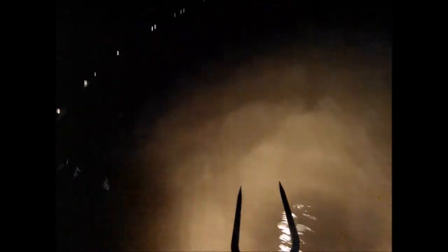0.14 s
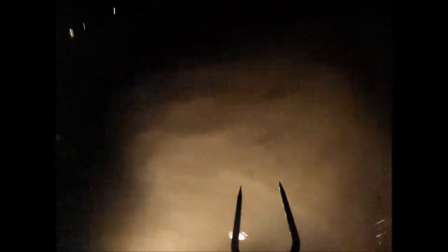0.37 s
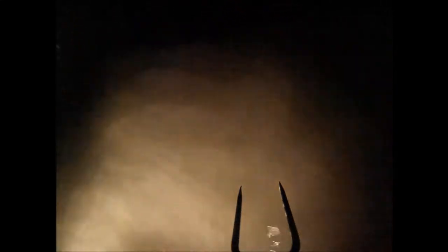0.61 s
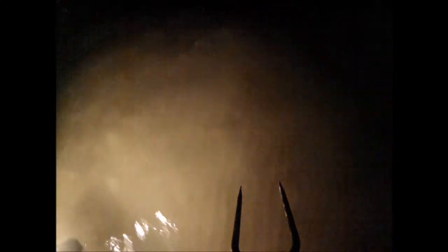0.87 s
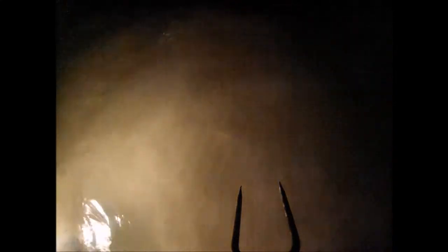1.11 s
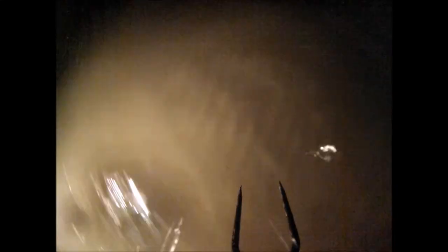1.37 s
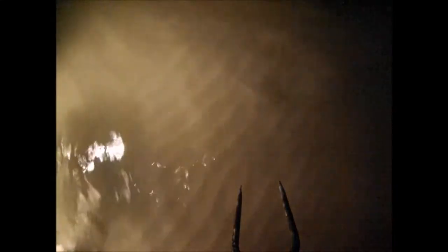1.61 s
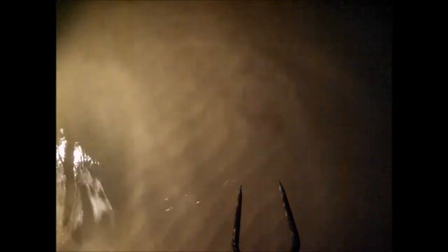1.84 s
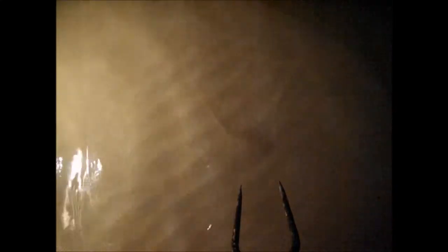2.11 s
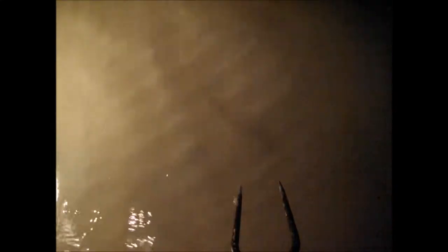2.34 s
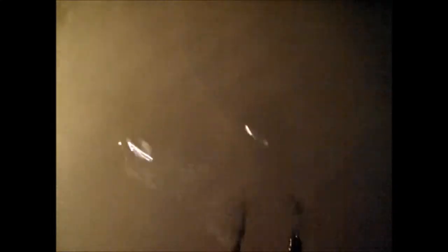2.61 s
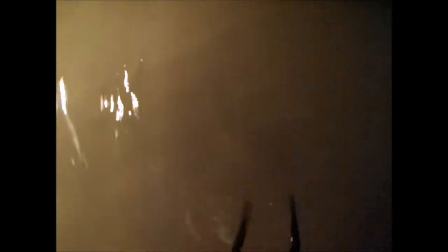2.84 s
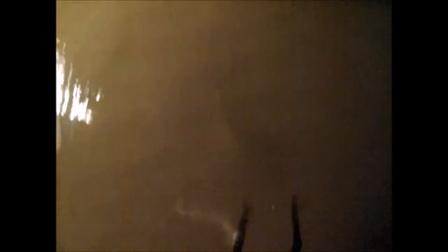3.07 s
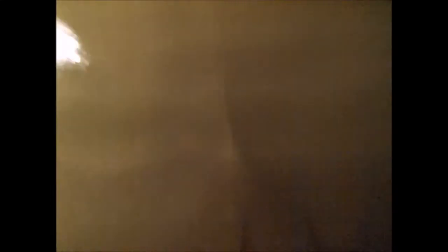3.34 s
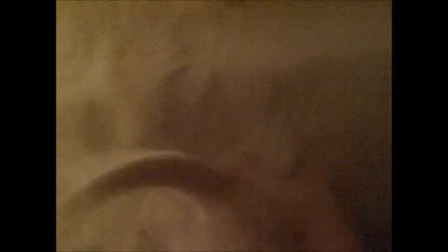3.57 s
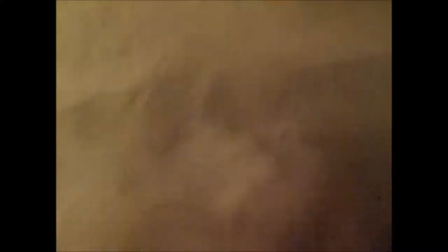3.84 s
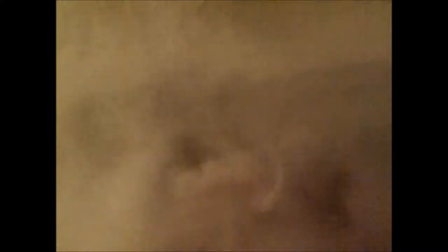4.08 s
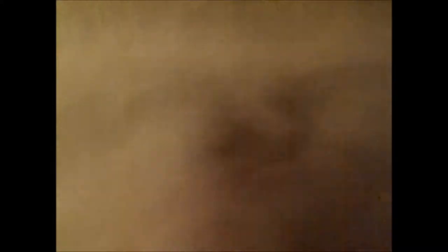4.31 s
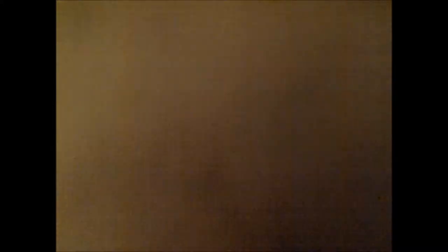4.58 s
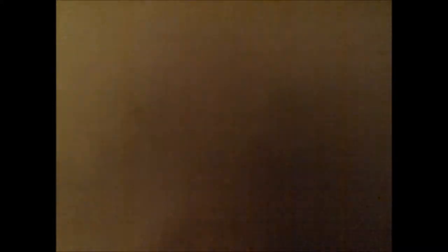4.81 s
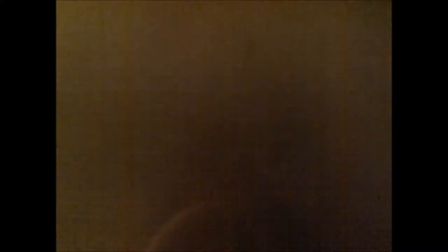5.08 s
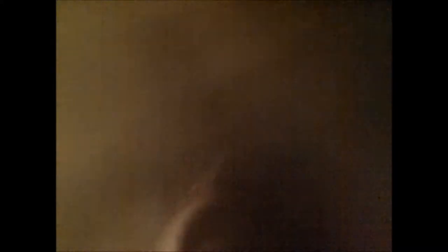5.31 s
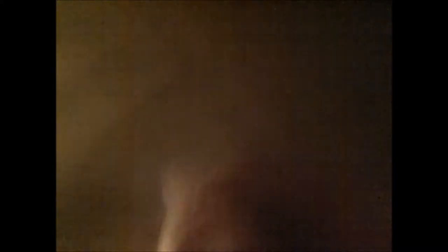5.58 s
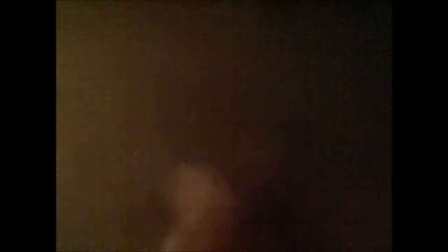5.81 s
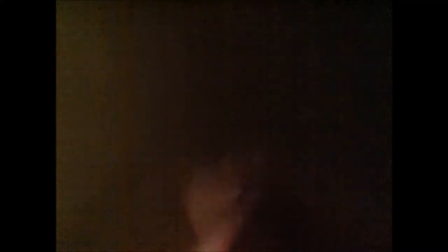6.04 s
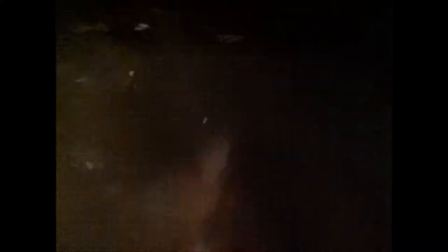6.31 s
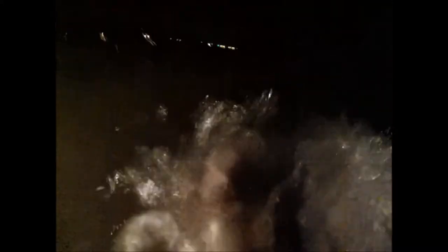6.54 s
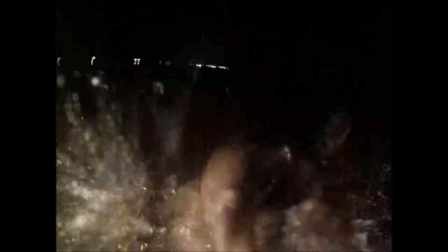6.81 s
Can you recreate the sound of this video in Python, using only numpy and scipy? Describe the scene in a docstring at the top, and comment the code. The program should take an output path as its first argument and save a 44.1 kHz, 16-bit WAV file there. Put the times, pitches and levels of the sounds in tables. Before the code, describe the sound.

Faint steady hiss under boomy pole vibration, with brief squeaky grip slides and hollow thuds. After a quiet lull the spear strikes the bottom with a sharp double crack and sandy crunch. Muffled water and sand drag along the shaft while trapped air burbles. Then the drag stops; drops plink, spray patters and dense slaps hit the housing, growing toward the end. Dry, contact-like, mono.

```python
"""A camera in a sealed housing rides a spear pole through shallow surf at night, over a faint steady hiss.
First hands slide on the shaft while the pole shakes, thumps and knocks; a few bubbles ring. At 3.4 s the spear
is driven into the bottom with a crunch; then water and sand rub along the pole and trapped air gurgles.
From 5.6 s small drops trickle, spray spatters, and drops and slaps strike the housing. Shaped noise makes the
friction, excited resonances the blows, decaying sines the thumps and bubbles."""
import sys
import numpy as np
from scipy import signal
from scipy.fft import rfft, irfft, next_fast_len
from scipy.io import wavfile
from scipy.ndimage import uniform_filter1d, map_coordinates

SR = 44100
rng = np.random.default_rng(int(sys.argv[2]) if len(sys.argv) > 2 else 0)


def magnitude_from_level(level_db):
    """Linear magnitude for a level in decibels (20 dB per decade)."""
    exponent = np.asarray(level_db, float) / 20
    return 10 ** exponent


def materialize(psi):
    """Save the field psi as 16-bit PCM at rate SR to the path in sys.argv[1].

    A 1-D psi becomes a single channel; in a 2-D psi each row is a channel.
    """
    bounded = np.clip(np.atleast_2d(psi).T, -1, 1)
    quanta = np.round(bounded * 32767).astype(np.int16)
    wavfile.write(sys.argv[1], SR, quanta)


N = 305172
TIME_S = np.arange(N) / SR
STAB_S = 3.4  # from here the prongs carry a load and the pole bends in other modes
SPLIT_HZ = 4500  # between body and treble of the friction sounds

# Spectrum of the microphone floor: frequency_hz, relative_level_db (per Hz)
HISS_SPECTRUM = [(120, -24), (200, -7), (380, -2.5), (647, -4.5), (1910, -20), (11700, -24.5), (16000, -41)]
# Shaking of the pole: time_s, sway_db, housing_drum_db
SHAKE_LEVELS = [(0.0, -32, -32), (0.07, -34.5, -46), (0.21, -44, -49), (0.42, -48, -69), (0.61, -51, -58),
                (0.85, -38, -49.5), (1.15, -39.5, -41), (1.39, -23.5, -37), (1.58, -40.5, -42),
                (1.81, -46.5, -63), (2.83, -53, -70.5), (3.03, -48, -46.5), (3.39, -49, -70),
                (3.55, -28, -38), (3.62, -28.5, -39.5), (3.76, -31, -29.5), (3.93, -42.5, -47.5),
                (4.49, -44, -48.5), (5.22, -46.5, -48.5), (5.61, -34.5, -47.5), (5.95, -32.5, -46.5),
                (6.4, -34.5, -46), (6.73, -29, -36.5), (6.92, -23, -36)]
# Unloaded pole, one bending mode then two drum modes: centre_hz, width_hz, relative_level_db
FREE_MODES = [(46, 16, 0), (122, 42, -2), (168.7, 75, -7)]
# Pole bending, the first mode throughout, the others under load: centre_hz, width_hz, relative_level_db
SWAY_MODES = [(28.8, 11, 0), (42.7, 10, -3), (83, 38, -6)]
# Housing as a drum while the pole is loaded: centre_hz, width_hz, relative_level_db
DRUM_MODES = [(134.6, 13, -6.5), (215, 42, -32.5)]
# Hands shifting their grip: start_s, level_db, slide_s, swell_db (over the slide)
GRIP_SLIDES = [(0, -47, 0.19, -1), (.49, -63, 0.024, -8.5), (0.558, -52, 0.047, -7.5),
               (0.721, -47.5, 0.0024, 5.5), (0.873, -47.5, 0.02, -6.5), (0.971, -50, 0.057, -0.5),
               (1.104, -45.5, 0.14, -4.5), (1.231, -42, 0.002, 3.5), (1.273, -47, 0.082, 12),
               (1.42, -55, 0.061, 0.5), (1.54, -46.5, 0.096, -17), (1.714, -68, 0.012, 15.5),
               (1.86, -63, 0.054, -1.5), (1.974, -60, 0.08, -13), (2.536, -58.5, 0.006, -13),
               (2.575, -59.5, .003, -11), (2.939, -50.5, 0.0036, -21), (2.97, -60.5, 0.0027, 7.5),
               (3.006, -52.5, 0.036, -13)]
# Pole and mount under a hand: centre_hz, width_hz, relative_level_db
GRIP_PEAKS = [(970, 180, -6.5), (1356, 75, -2.5), (1667, 147, -1), (2504, 22, -11), (3306, 210, -14.5),
              (5500, 210, -23), (10600, 2600, -45)]
# Broad slope under those peaks: frequency_hz, relative_level_db
GRIP_SLOPE = [(150, 5.5), (300, -2), (600, -4), (1200, -9.5), (2000, -15), (2600, -24.5), (5000, -32),
              (10000, -49), (16000, -90)]
# Thumps carried up the pole: start_s, level_db, pitch_hz
THUMP_EVENTS = [(0.004, -20, 58.7), (0.733, -22, 46), (0.857, -26.5, 48.2), (0.596, -27, 121),
                (0.721, -14.5, 134), (0.872, -22, 123), (0.97, -20.5, 122), (1.104, -17, 125),
                (1.298, -16.5, 123), (1.361, -10, 30.5), (1.537, -25, 130), (2.934, -32.5, 110),
                (3.002, -27, 122), (3.2, -35, 161), (3.398, -9.5, 112.6), (3.445, -3.5, 128.3),
                (3.457, -1.5, 138.3), (3.5509, -6.5, 134.8), (3.555, -13, 59.3), (3.568, -19.5, 28.4),
                (3.67, -24.5, 28.8), (4.26, -29, 84.3), (5.169, -26.5, 32), (5.34, -20.5, 29.4),
                (5.631, -19.5, 44.7), (5.86, -15, 29.7), (4.478, -26, 130), (5.077, -25, 146),
                (5.992, -19.5, 130.3), (6.118, -16, 123), (6.53, -23.5, 139), (6.745, -16.5, 146),
                (6.829, -14.5, 97)]
# Knocks of pole and mount: start_s, hard_drive_db, hollow_db (relative to hard)
KNOCK_EVENTS = [(0.7188, -42.5, 15.5), (1.1983, -36.5, 11.5), (1.2279, -26.5, 8), (1.5025, -35, 7),
                (1.5584, -31, -1.5), (1.5859, -32, 5.5), (1.9737, -50.5, 12.5), (2.14, -63.5, 13),
                (2.392, -57, 9), (2.829, -51, 9.5), (2.9318, -48, 9.5), (3.6511, -34, 11),
                (3.6741, -34, 15.5), (3.7388, -22, 12.5), (3.7691, -45, 25.5), (3.8093, -26, 9.5),
                (3.8914, -31, 10.5), (4.243, -40.5, 14), (4.56, -37.5, 14), (4.8853, -48.5, 27.5),
                (5.9902, -40, 15.5), (6.115, -35.5, 12.5), (6.295, -47, 20.5)]
# Blows, slaps and drops on the housing: start_s, hard_drive_db, bright_db and spray_db (relative to hard),
# decay_s (to 60 dB down, before each mode group's own exponent)
HIT_EVENTS = [(1.384, -37, 2, 2, 0.017), (3.341, -39.5, -10.5, -26, 0.06), (3.39, -27, -11, -11.5, 0.017),
              (3.3951, 10, 1.5, 0, 0.012), (3.4056, -13, -10, -9, .03), (3.4155, -16, 10, -7.5, 0.013),
              (3.4185, -18, 11, -8, 0.018), (3.428, -15.5, 4.5, -5, 0.027), (3.4448, 5.5, -38, -18, 0.03),
              (3.4597, -2, -32, -10, 0.024), (3.4657, -8, -27, -15, 0.025),
              (3.528, -12, -6.5, -19.5, 0.035), (3.5418, 2, -4, -27, 0.012), (3.5491, -5, -7, -13, 0.02),
              (3.554, -2, -15, -5, 0.026), (5.659, -28.5, -34, -44, 0.031), (5.733, -39, -2.5, -9.5, 0.041),
              (5.7679, -30, -12.5, -12, 0.057), (5.887, -43.5, 0, 4.5, 0.056),
              (5.9132, -46, 4.5, -3, 0.018), (6.0167, -41.5, -4, -12.5, 0.055),
              (6.1951, -31, -3, -5, 0.022), (6.259, -47, -2, -5, 0.033), (6.273, -42, -9, -12, .02),
              (6.2805, -37.5, 1, 10, 0.022), (6.288, -46, 1, 6, .04), (6.297, -32, -21, -25, 0.02),
              (6.322, -29.5, -3, 3, 0.022), (6.3689, -7.5, -11.5, -38, 0.026), (6.378, -38, -8, -14, 0.063),
              (6.4022, -42, 8, 0, 0.023), (6.4221, -38, 2, 12, 0.013), (6.4266, -10, -13.5, -20, 0.023),
              (6.4376, -15, -11, -14, 0.025), (6.4504, -33, 8, 6, .018), (6.4766, -22, -6, -24, 0.015),
              (6.5262, -26.5, -17, -32, 0.096), (6.5676, -20.5, -23, -27, 0.035),
              (6.598, -16, -23, -32, 0.026), (6.611, -11, -12, -19, 0.029), (6.644, -30, -8, -13, 0.017),
              (6.682, -13.5, -10, -8, 0.017), (6.6996, -3.5, -6, -11, 0.016), (6.722, -41, -6, -2.5, 0.034),
              (6.7337, -14.5, -13, -9, 0.02), (6.7497, 3.5, -16.5, -13, 0.018),
              (6.792, -24.5, -16, -15, 0.028), (6.808, -37.5, -3, -8, 0.05),
              (6.833, -17.5, -8, -10.5, 0.028), (6.836, -22.5, -14, -23, 0.055),
              (6.8598, -21.5, -13, -18, 0.058), (6.873, -23, -8.5, -22, 0.043),
              (6.881, -19.5, -14, -27.5, 0.058), (6.9003, -14.5, -11, -21, 0.042)]
# The mount under a knock: centre_hz, width_hz, relative_level_db
MOUNT_MODES = [(241, 246, 0.0083)]
# Housing modes in four groups, hollow, hard, bright, spray: centre_hz, width_hz, relative_level_db
BLOW_GROUPS = [
    [(320, 530, -10.5), (527, 90, 8.5), (775, 140, 6)],
    [(1282, 347, 6), (1610, 454, 5.5), (2200, 680, 0.5)],
    [(3560, 430, 4.5), (5140, 430, 2.5), (6800, 1400, -1)],
    [(9900, 2300, 0.5), (12500, 2600, -2.5)],
]
# Decay shape of mount and four groups: time_exponent (1 = plain decay, more = holds, then stops short)
DECAY_SHAPES = [
    [1],
    [0.86],
    [1.02],
    [1.49],
    [1.18],
]
# Band the walls pass weakly: centre_hz, width_hz, subtracted_db
DEAD_BAND = [(8700, 3300, -5.5)]
# Bubbles: start_s, level_db, pitch_hz
BUBBLE_EVENTS = [(2.536, -51, 2070), (2.571, -50, 2140), (3.341, -35, 1605), (3.596, -39, 4330),
                 (3.629, -37, 5100), (3.864, -30, 1222), (4.141, -47.5, 1442), (4.165, -42.5, 1855),
                 (4.176, -40.5, 1310), (4.9, -30.5, 395), (5.434, -30.5, 2345), (5.66, -35, 1310),
                 (5.661, -38, 2500), (5.769, -39, 1060), (5.768, -29, 3870), (5.9134, -30.5, 2500),
                 (6.139, -40.5, 2940), (6.176, -43, 1500), (6.181, -40.5, 2200), (6.201, -34.5, 1740),
                 (6.2033, -31.5, 5070), (6.205, -31, 3300), (6.212, -17.5, 2384), (6.229, -38, 3470),
                 (6.241, -36, 2070), (6.241, -35, 3480), (6.3072, -21, 1740), (6.316, -17, 5570),
                 (6.339, -32, 2200), (6.397, -29, 5100), (6.4504, -23.5, 3880), (6.538, -38, 1900),
                 (6.569, -32, 1470), (6.8155, -24, 2540)]
# Resonances of the housing walls: centre_hz, width_hz, relative_level_db
HOUSING_PEAKS = [(526.6, 100, 3.5), (735, 40, 0.5), (1020, 29, -4.5), (1332, 120, -10), (1571, 120, -3.5),
                 (2070, 160, -8.5), (2960, 130, -17.5), (3630, 110, -24.5), (4260, 91, -27),
                 (5230, 250, -29), (5870, 88, -31), (6250, 320, -37.5), (7700, 570, -41),
                 (8640, 250, -46.5), (9150, 380, -48), (11300, 500, -47.5), (11900, 700, -45),
                 (13790, 460, -55.5)]
# Broad slope under the housing peaks: frequency_hz, relative_level_db
HOUSING_SLOPE = [(150, -5), (400, -15.5), (1000, -20.5), (2500, -19), (3300, -27.5), (5000, -43.5),
                 (10000, -69.5), (16000, -94)]
# The thrust grinding into the sand: time_s, body_db, treble_db
THRUST_LEVELS = [(3.392, -84, -93), (3.397, -18, -33), (3.41, -15.5, -32.5), (3.43, -28.5, -40),
                 (3.475, -26.5, -47.5), (3.522, -28, -46.5), (3.538, -17.5, -34), (3.553, -13.5, -27),
                 (3.56, -19, -55), (3.575, -74, -87.5)]
# Spectrum of the grinding: frequency_hz, relative_level_db (per Hz)
GRIND_SPECTRUM = [(150, -32.5), (250, 3.5), (436, -5.5), (528, -2.5), (662, -5.5), (906, 3.5), (1180, -7),
                  (1380, -4), (2400, -6), (3600, -18.5), (6500, -28.5), (8200, -36), (9700, -31.5),
                  (10600, -37.5), (12000, -32.5), (16000, -45)]
# Water and sand dragging along pole and housing, then running off: time_s, rub_db, fizz_db
DRAG_LEVELS = [(3.53, -110, -110), (3.573, -37.5, -69), (3.66, -58, -67), (3.8, -44, -70.5),
               (3.93, -43, -67), (4.08, -51, -72.5), (4.18, -48.5, -83), (4.25, -62, -85),
               (4.32, -44.5, -70), (4.5, -50, -76), (4.57, -44.5, -68.5), (4.9, -36.5, -58),
               (5.0, -41.5, -63), (5.2, -39, -61.5), (5.35, -41, -59.5), (5.54, -40.5, -58.5),
               (5.61, -69.5, -92), (6.17, -75, -101), (6.25, -64, -74.5), (6.4, -59, -87),
               (6.55, -55.5, -73), (6.66, -47, -67), (6.78, -53, -70), (6.84, -36, -65), (6.92, -44, -59)]
# Brief stalls of the flow: centre_s, depth_db, half_length_s
FLOW_STALLS = [(4.227, 10.5, 0.022), (4.801, 1, .012), (5.269, 6, 0.039), (5.438, 4, 0.0062)]
# Gurgle of trapped air while the catch is dragged under water: time_s, level_db
GURGLE_LEVELS = [(3.58, -31.5), (3.95, -50), (4.4, -49), (4.9, -49), (5.2, -43), (5.55, -62)]
# Trickle of small drops as the catch breaks the surface: time_s, level_db
RUNOFF_LEVELS = [(5.6, -66.5), (6.299, -61.5), (6.6, -55.5), (6.8, -44), (6.92, -35)]
# Fine spray spattering the housing: time_s, level_db
MIST_LEVELS = [(6.17, -73), (6.3, -63), (6.39, -52), (6.5, -59), (6.65, -54), (6.92, -46)]


def curves(rows):
    """Linear interpolation: one value per sample for each column after the time."""
    s, *columns = np.transpose(rows)
    return [np.interp(TIME_S, s, column) for column in columns]


def unit(x):
    """Normalisation to rms 1."""
    return x / np.sqrt(np.mean(x ** 2) + 1e-20)


def wobble(rate):
    """Slow random fluctuation: a smooth curve through rate random knots a second."""
    knots = rng.standard_normal(int(N * rate / SR) + 4)
    return map_coordinates(knots, [TIME_S * rate])


def filtered(x, response):
    """Linear filtering: the spectrum of x times a complex response of frequency."""
    m = next_fast_len(N + SR // 2)
    return irfft(rfft(x, m) * response(np.fft.rfftfreq(m, 1 / SR)), m)[:N]


def colour(points):
    """Spectral envelope: gain through (Hz, dB) points on a log frequency axis."""
    f, db = np.transpose(points)
    return lambda hz: magnitude_from_level(np.interp(np.log(hz + 1), np.log(f + 1), db))


def modes(table):
    """Modal superposition: causal resonances summed with alternating sign."""
    def response(f):
        return sum((-1) ** k * magnitude_from_level(db) * 1j * f * w / (c * c - f * f + 1j * f * w)
                   for k, (c, w, db) in enumerate(table))
    return response


def through(peaks, slope):
    """Transmission path: sharp-flanked resonances and a broad slope, added in power."""
    def gain(f):
        power = sum(magnitude_from_level(2 * db) / (1 + (2 * (f - c) / w) ** 2) ** 1.4 for c, w, db in peaks)
        return np.sqrt(power + colour(slope)(f) ** 2)
    return gain


def lower_band(x):
    """Band splitting: what lies below a gentle edge at SPLIT_HZ."""
    return filtered(x, lambda f: 1 / (1 + (f / SPLIT_HZ) ** 4))


def grit(spread_db, rate):
    """Stick-slip friction: noise whose size jumps about, as grains catch and slip."""
    return rng.standard_normal(N) * magnitude_from_level(spread_db * wobble(rate))


def patchy(x, patchy_db):
    """Turbulence: random patches of gain over time and frequency, as eddies come and go."""
    z = signal.stft(x, nperseg=512)[2]
    across_hz = uniform_filter1d(rng.standard_normal(z.shape), size=3, axis=0)
    field = uniform_filter1d(across_hz, size=18, axis=1)
    return signal.istft(z * magnitude_from_level(patchy_db * unit(field)), nperseg=512)[1][:N]


def hiss():
    """Self-noise: the microphone's own steady, coloured hiss."""
    return magnitude_from_level(-77.5) * unit(filtered(rng.standard_normal(N), colour(HISS_SPECTRUM)))


def shake():
    """Forced vibration: hands and waves keep the pole's bending modes and the housing drum going."""
    sway_db, drum_db = curves(SHAKE_LEVELS)
    free = TIME_S < STAB_S

    def share(free_db, loaded_db):  # of the sway; each share drifts on its own
        return sway_db + np.where(free, free_db, loaded_db) + 1.56 * wobble(5.9)

    def before_and_after(x, free_response, loaded_response):
        return np.where(free, unit(filtered(x, free_response)), unit(filtered(x, loaded_response)))

    def walls(f):
        return f * f / (f * f + 90 ** 2) / (1 + (f / 225) ** 8)

    swing_db, bend_db = share(-5, 0.5), share(2.5, -1)
    swing = filtered(grit(2.4, 17), lambda f: modes(SWAY_MODES[:1])(f) ** 2)
    bend = before_and_after(grit(2.4, 14), lambda f: modes(FREE_MODES[:1])(f) ** 2,
                            lambda f: modes(SWAY_MODES[1:])(f) / (1 + (f / 100) ** 4))
    drum = before_and_after(grit(2.7, 30), lambda f: modes(FREE_MODES[1:])(f) * walls(f),
                            lambda f: modes(DRUM_MODES)(f) * walls(f))
    return magnitude_from_level(swing_db) * unit(swing) + magnitude_from_level(bend_db) * bend + magnitude_from_level(drum_db) * drum


def scuff():
    """Sliding friction: skin on the wet shaft grabs, slides and lets go."""
    grab_db_per_s, let_go_db_per_s = 1098.5, 526
    press = np.zeros(N)
    for s, db, slide, swell_db in GRIP_SLIDES:
        swell = swell_db * np.clip((TIME_S - s) / slide, 0, 1)
        grab = grab_db_per_s * np.maximum(s - TIME_S, 0)
        let_go = let_go_db_per_s * np.maximum(TIME_S - s - slide, 0)
        press += magnitude_from_level(db + swell - grab - let_go)
    return press * unit(filtered(grit(3.64, 200), through(GRIP_PEAKS, GRIP_SLOPE)))


def thumps():
    """Damped free vibration: each jolt rings the housing drum or the whole pole for a few cycles."""
    ring_cycles = 12  # to 60 dB down
    out, t = np.zeros(N + SR), np.arange(SR // 2) / SR
    for s, db, hz in THUMP_EVENTS:
        onset = 1 - np.exp(-t * hz / 0.18)
        decay = magnitude_from_level(db - 60 * t * hz / ring_cycles)
        out[round(s * SR):][:len(t)] += decay * onset * np.sin(2 * np.pi * hz * t)
    return out[:N]


def hits():
    """Impact excitation: short noisy blows drive groups of modes; only knocks reach the mount."""
    blows, t = np.zeros((5, N + SR)), np.arange(SR // 8) / SR  # rows: mount, hollow, hard, bright, spray
    snap = 1 + 2.2 * np.exp(-t / 0.00048)  # the first contact is the hardest
    onset = 1 - np.exp(-t / [[.001], [.0003], [.00029], [.0006], [.0006]])
    fade_exponent = [[.7], [.6], [1.2], [3.5], [4]]  # treble dies first
    # each event: start, drive, mount, hollow, bright and spray shares, decay
    events = [(s, db, hollow_db + 9.5, hollow_db, -39, -np.inf, 0.033) for s, db, hollow_db in KNOCK_EVENTS]
    for s, db, *rest in HIT_EVENTS:
        hollow_db = -8 - 0.0376 * db  # the harder the blow, the smaller its hollow share
        events.append((s, db, -np.inf, hollow_db, *rest))
    for s, db, mount_db, hollow_db, bright_db, spray_db, decay_s in events:
        fade = magnitude_from_level(-60 * (t / decay_s) ** DECAY_SHAPES) * onset
        size = magnitude_from_level(db + np.array([[mount_db], [hollow_db], [0], [bright_db], [spray_db]]))
        noise = rng.standard_normal((5, len(t)))
        blows[:, round(s * SR):][:, :len(t)] += size * fade ** fade_exponent * snap * noise

    def steep(group):  # a broad resonance, squared, steepens the flanks of the group
        lowest_hz = group[0][0]
        broad = modes([(lowest_hz * 1.3, lowest_hz * 2.5, 0)])
        return lambda f: modes(group)(f) * broad(f) ** 2

    groups = [MOUNT_MODES] + list(BLOW_GROUPS)
    mount, *walls = (filtered(blow[:N], steep(group)) for blow, group in zip(blows, groups))
    return mount + filtered(sum(walls), lambda f: 1 - modes(DEAD_BAND)(f))


def bubbles():
    """Bubble resonance: trapped air pops and sings one short, unsteady note that drifts in pitch."""
    ring_cycles, pop_db, pop_s = 50.7, 5.5, .0015  # ring to 60 dB down; click as it pinches off
    notes, pops, t = np.zeros(N + SR), np.zeros(N + SR), np.arange(SR // 8) / SR
    for s, db, hz in BUBBLE_EVENTS:
        fade = magnitude_from_level(db - 60 * t * hz / ring_cycles) * (1 - np.exp(-t / 0.0014))
        pop = magnitude_from_level(db + pop_db) * np.exp(-t / pop_s) * rng.standard_normal(len(t))
        drift = 1 + rng.normal(-1.2, 0.9) * t
        pops[round(s * SR):][:len(t)] += pop
        notes[round(s * SR):][:len(t)] += fade * np.sin(2 * np.pi * hz * t * drift)
    flutter = magnitude_from_level(4 * wobble(350))
    return notes[:N] * flutter + filtered(pops[:N], through(HOUSING_PEAKS[3:], HOUSING_SLOPE))


def thrust():
    """Granular friction: the prongs crunch through sand; the treble comes and goes on its own."""
    body_db, treble_db = curves(THRUST_LEVELS)
    crunch = filtered(patchy(grit(3.5, 250), patchy_db=3), colour(GRIND_SPECTRUM))
    body = lower_band(crunch)
    return magnitude_from_level(body_db) * unit(body) + magnitude_from_level(treble_db) * unit(crunch - body)


def drag():
    """Flow friction: gritty noise through the housing, its body and its fizz moving apart."""
    rub_db, fizz_db = curves(DRAG_LEVELS)
    stall_db = sum(db * np.exp(-((TIME_S - s) / half) ** 4) for s, db, half in FLOW_STALLS)
    grains = grit(1.0, 45) * magnitude_from_level(0.8 * wobble(300))
    rub = filtered(patchy(grains, patchy_db=2.5), through(HOUSING_PEAKS, HOUSING_SLOPE))
    low = lower_band(rub)
    body = magnitude_from_level(rub_db + 0.44 * wobble(20)) * unit(low)
    fizz = magnitude_from_level(fizz_db + 0.89 * wobble(3.7)) * unit(rub - low)
    return magnitude_from_level(-stall_db) * (body + fizz)


def droplets(flow, low_hz, span, spread_db, count):
    """Bubble statistics: many small random notes, from low_hz up to span times that pitch."""
    out, t = np.zeros(N + SR), np.arange(SR // 30) / SR
    s, db = np.transpose(flow)
    for when, pitch, size, glide in rng.random((count, 4)):
        at = s[0] + (s[-1] - s[0]) * when
        hz = low_hz * span ** pitch ** 1.6  # low pitches are commoner
        level = magnitude_from_level(np.interp(at, s, db) + spread_db * size ** 11)  # a few are much louder
        fade = np.exp(-t * hz / 2.73) * (1 - np.exp(-t / 0.001))  # a few cycles of life
        note = np.sin(2 * np.pi * hz * t * (1 + 6 * (glide - .5) * t))
        out[round(at * SR):][:len(t)] += level * fade * note
    return out[:N]


def scene():
    """Superposition: all sources over the microphone's own hiss, in one channel."""
    handling = shake() + scuff() + thumps() + hits()
    friction = thrust() + drag()
    gurgle = droplets(GURGLE_LEVELS, low_hz=307, span=3.62, spread_db=8, count=300)
    runoff = droplets(RUNOFF_LEVELS, low_hz=449, span=5.74, spread_db=15.5, count=900)
    mist = droplets(MIST_LEVELS, low_hz=2500, span=5.5, spread_db=18, count=500)
    return (hiss() + handling + bubbles() + friction + gurgle + runoff + mist)[None]


def roll_off(x):
    """The treble ends steeply here."""
    return signal.sosfilt(signal.butter(12, 16490, fs=SR, output="sos"), x)


def record(dry):
    """Band limit and saturation: the microphone fades out at the top; the loudest blows clip at full scale."""
    top_hz = 15500
    heard = filtered(dry[0], lambda f: 1 / (1 + (f / top_hz) ** 40))[None]
    clipped = heard / (1 + abs(heard) ** 8) ** (1 / 8)
    return roll_off(clipped)


dry = scene()
out = record(dry)
materialize(out)
```